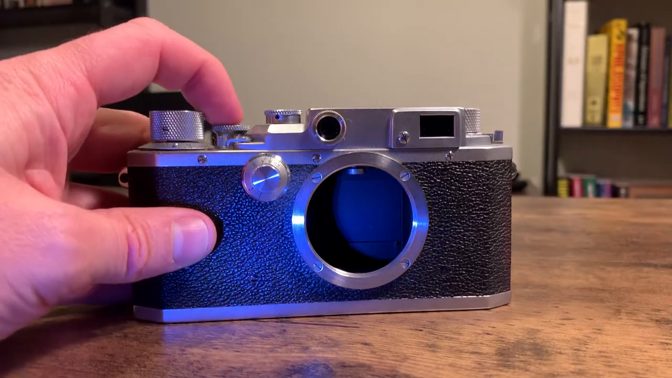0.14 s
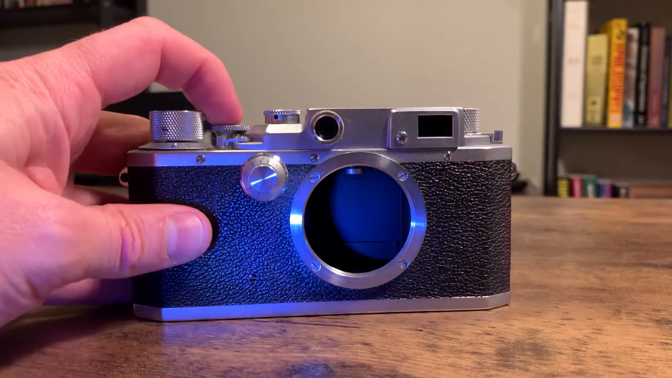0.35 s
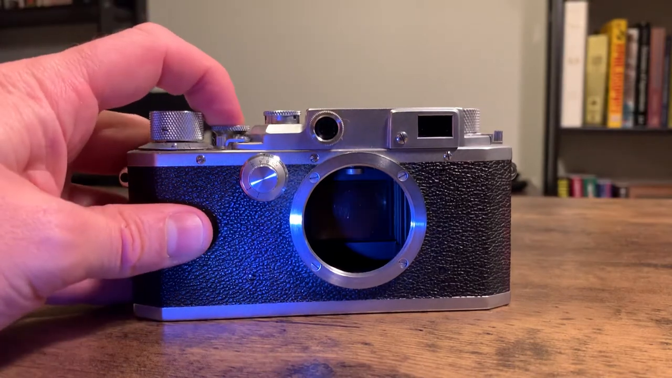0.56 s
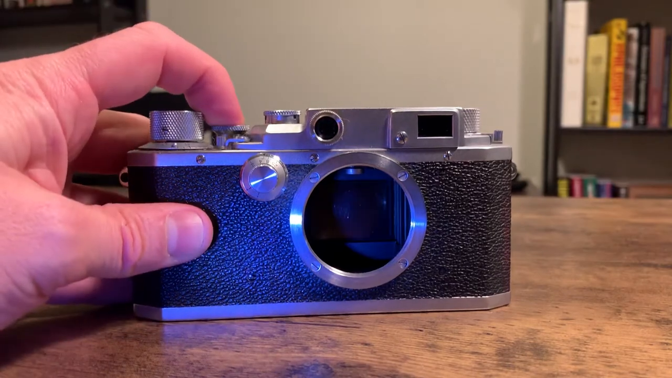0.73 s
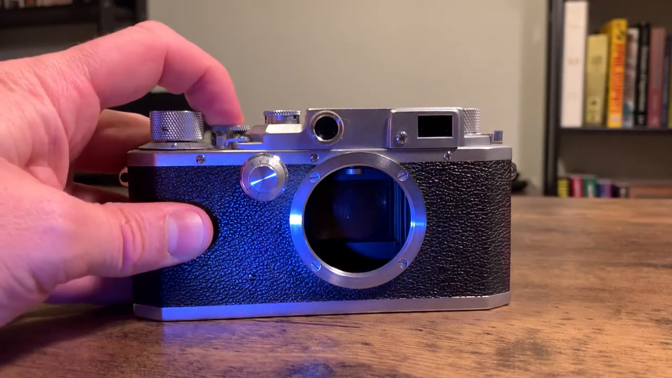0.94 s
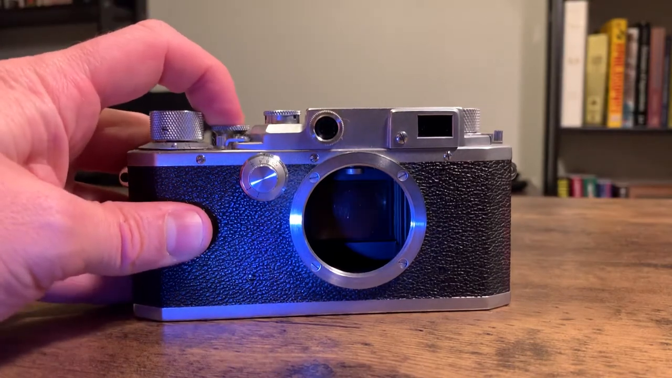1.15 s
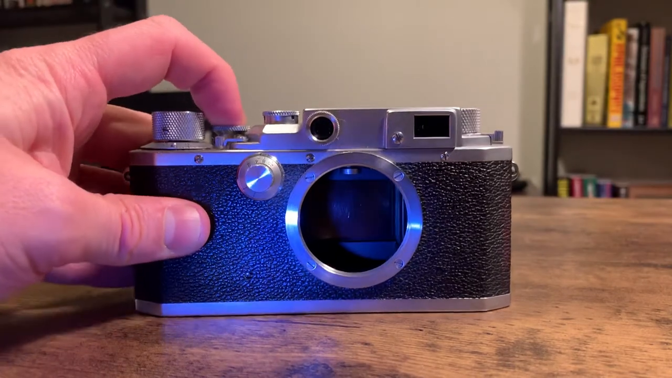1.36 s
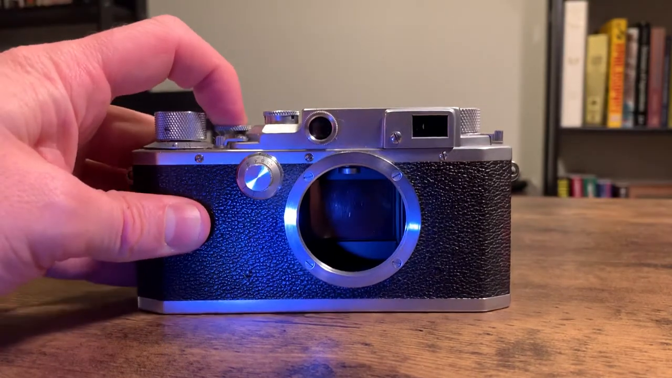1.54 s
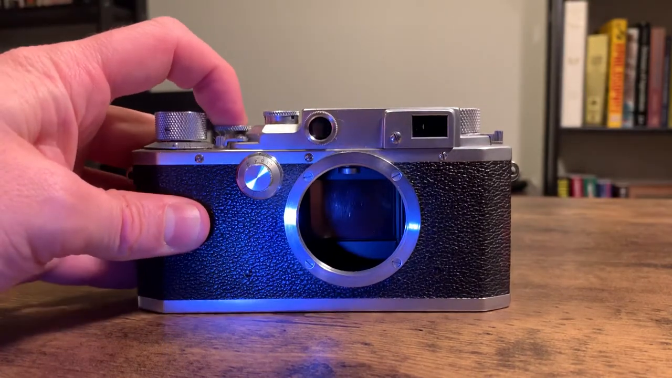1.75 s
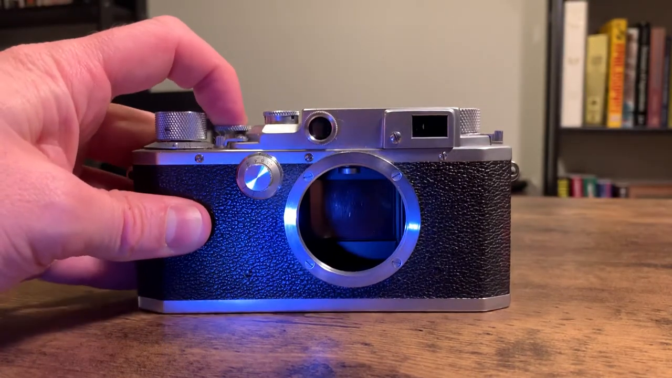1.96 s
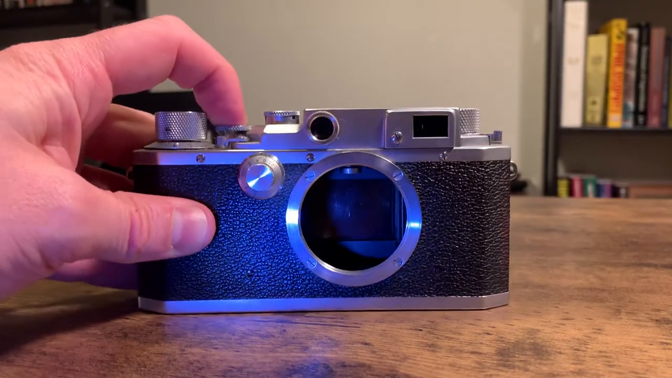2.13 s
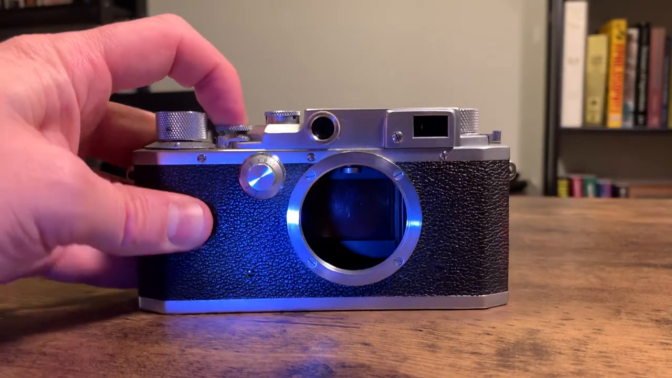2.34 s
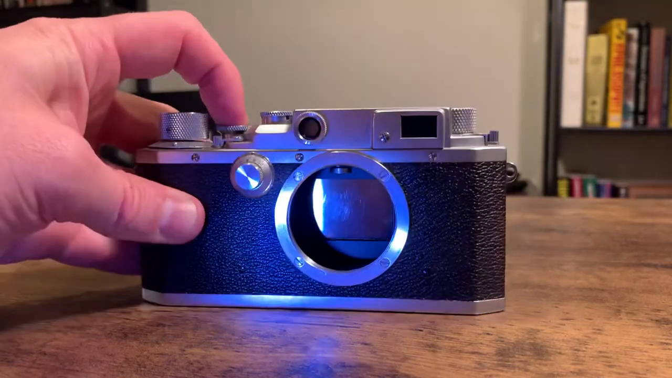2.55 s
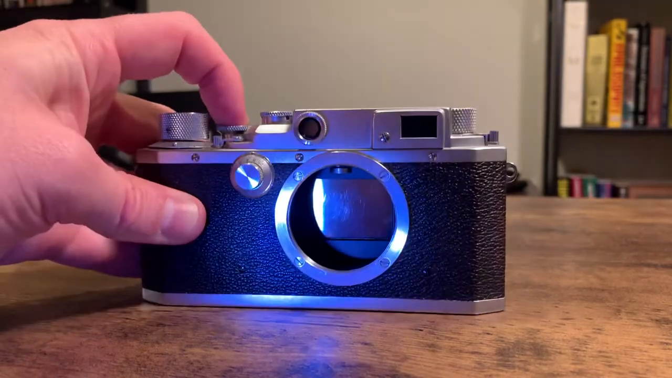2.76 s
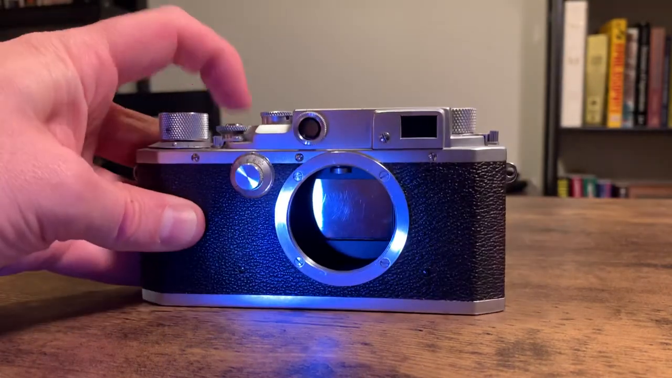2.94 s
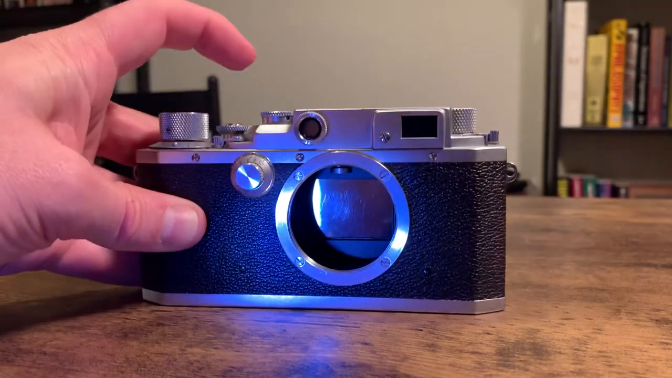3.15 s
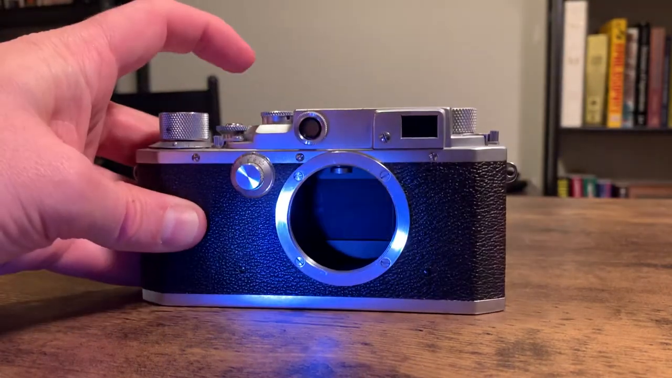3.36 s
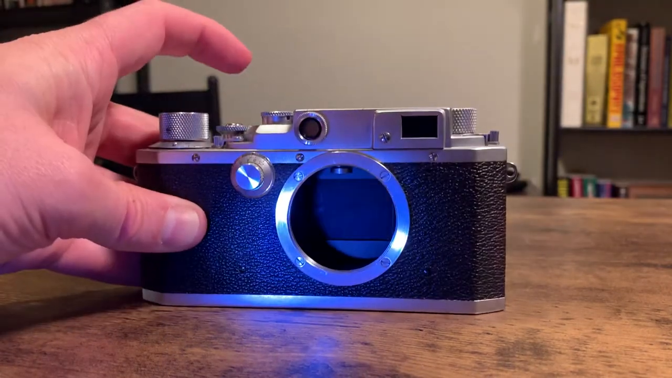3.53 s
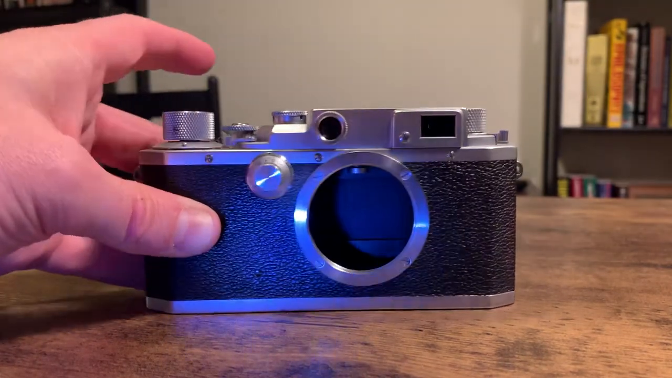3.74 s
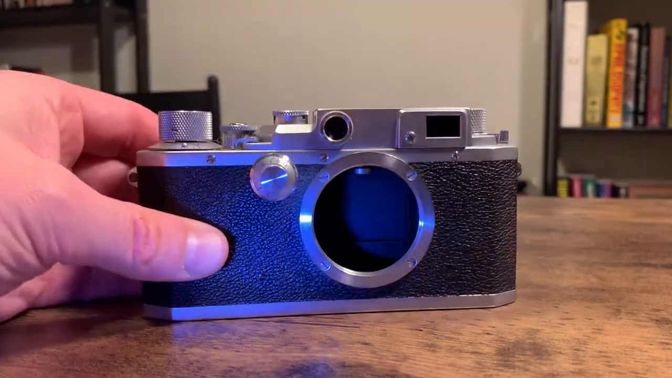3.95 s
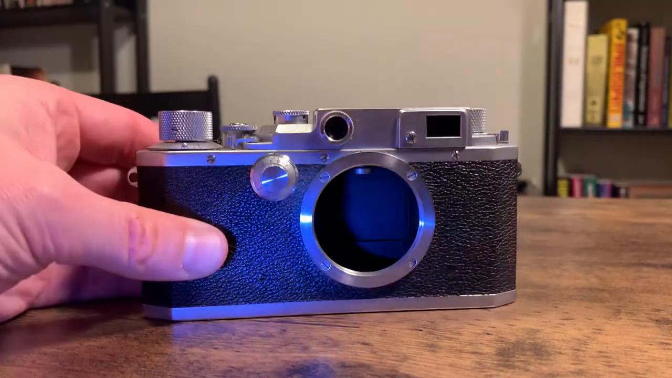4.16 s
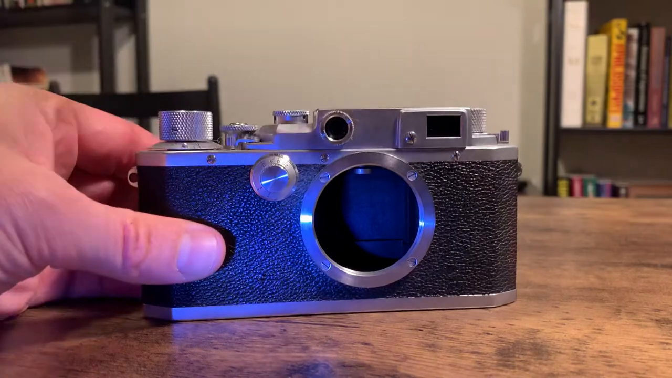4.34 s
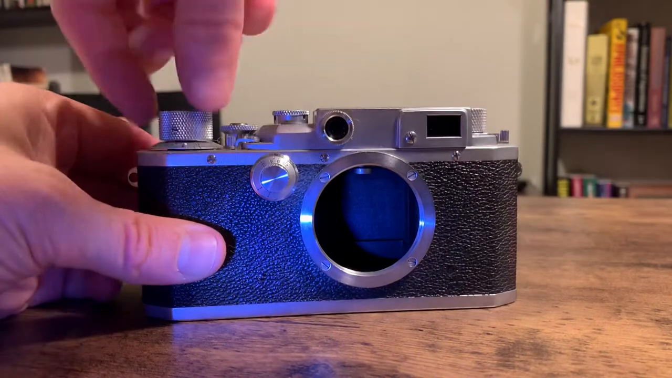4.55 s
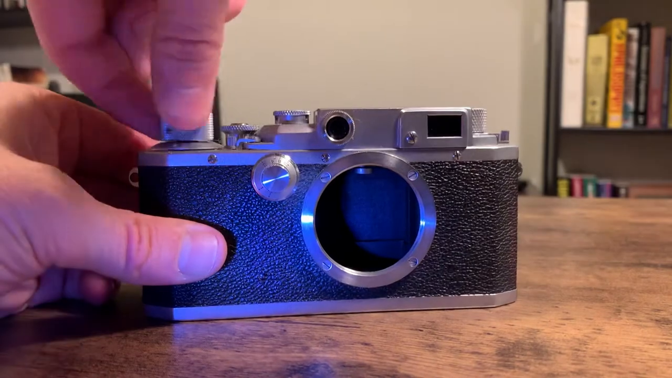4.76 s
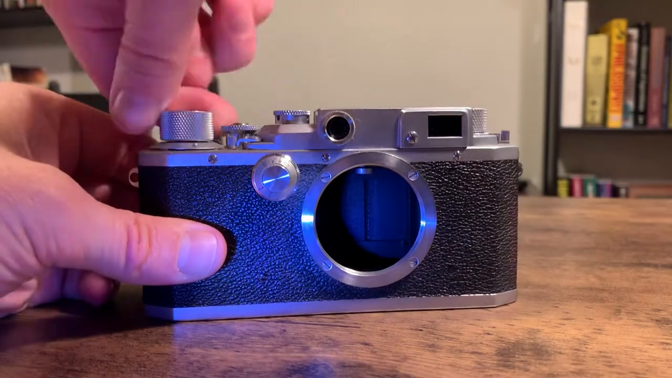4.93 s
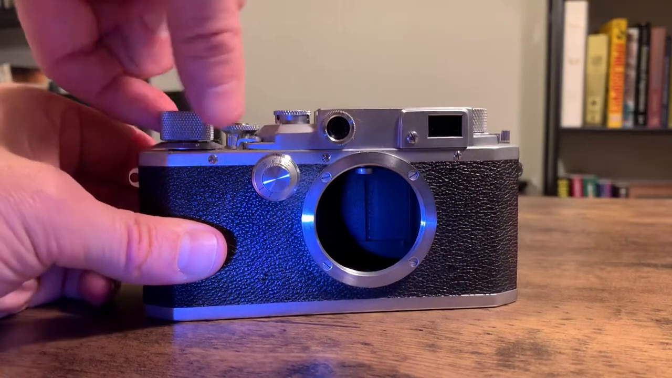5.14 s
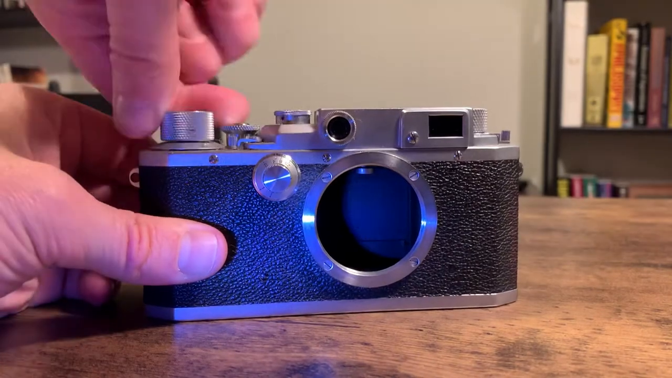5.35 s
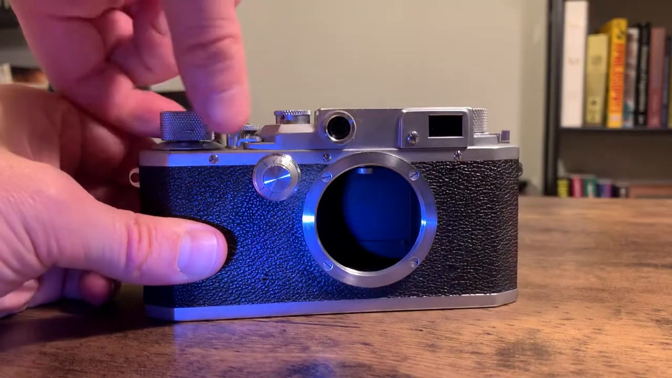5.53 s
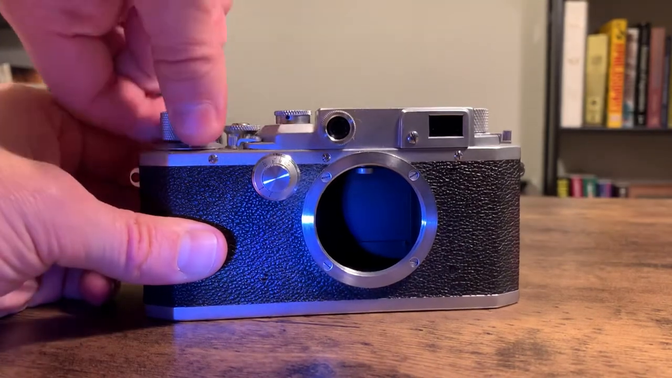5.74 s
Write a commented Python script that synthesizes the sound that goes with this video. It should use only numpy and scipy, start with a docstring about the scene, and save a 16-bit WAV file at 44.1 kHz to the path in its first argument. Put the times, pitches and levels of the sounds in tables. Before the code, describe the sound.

A quiet room with soft low air noise, faint hiss and a distant appliance hum, heard by a close stereo microphone. At about 0.4 s an old mechanical camera on a wooden table fires: a light click swells within a tenth of a second into a loud, bright steel clack with a dull body and table knock. Tiny bumps follow at 0.6 and 1.2 s, then faint finger clicks and a slight creak around 1.9-2.3 s. At 2.8 s a smaller click starts a fast, dry gear buzz that runs to about 3.17 s and ends at 3.2 s in a crisp, high metallic snap. Muffled bumps and scrapes come at 3.6-3.9 s. Around 4.2-4.4 s a nail ticks over knob ridges; small metal clicks cluster at 4.5-4.8 s, soft winding and creaking near 5-5.3 s, and a firmer click at 5.57 s before handling fades.

```python
"""An old cloth-shutter camera trips and slams on a wooden table, close to two microphone ports in a quiet room.
Later its slow-speed gears buzz until the second curtain runs and slams; fingers shift the body and wind the knob.
Blows and rubbing are bursts of noise sent through the resonances of steel, shell and table, with decaying pings.
A far appliance hums in wavering sine tones under the room air, which is shaped noise."""
import sys
import numpy as np
from scipy import signal
from scipy.fft import rfft, irfft, next_fast_len
from scipy.io import wavfile
from scipy.ndimage import uniform_filter1d, map_coordinates

SR = 44100
rng = np.random.default_rng(int(sys.argv[2]) if len(sys.argv) > 2 else 0)


def wrap_up_sound(samples):
    """Save the sound to the file named by the first command line argument, as 16-bit audio."""
    columns = np.atleast_2d(samples).T
    # keep every value between -1 and 1, then stretch to whole-number steps
    tamed = np.clip(columns, -1, 1)
    steps = np.round(tamed * 32767).astype(np.int16)
    wavfile.write(sys.argv[1], SR, steps)


N = 255515

# Resonances of the steel parts: (f/Hz, width/Hz, level/dB)
STEEL_MODES = [(2860, 250, -9), (3450, 250, -7), (4000, 300, -10), (4700, 350, -6), (5250, 400, -11),
               (5920, 190, -2), (6760, 190, -4), (7600, 350, -4), (9100, 400, -7), (10350, 280, 0),
               (11400, 300, -3), (12400, 400, -3), (13300, 500, -4), (14650, 250, 1), (15400, 250, -2)]
# Resonances of the camera body: (f/Hz, width/Hz, level/dB)
SHELL_MODES = [(1122, 180, -0.5), (1392, 42, 2), (1507, 260, -3.5), (1917, 350, -3.5), (2409, 340, -6.5)]
# Resonances of the wooden table: (f/Hz, width/Hz, level/dB)
TABLE_MODES = [(88.6, 29, 7), (178.6, 290, -4.5), (265, 55, 1.5), (315.1, 9.4, 2.5), (374.7, 87, 0),
               (431, 114.3, 4.5), (566, 130, -1), (636.4, 22, 3.5), (840, 78, -5)]
# Resonances of the ridged (knurled) winding knob: (f/Hz, width/Hz, level/dB)
KNOB_MODES = [(2945, 110, 10.5), (3550, 350, 6.5), (4400, 440, 3)]
# Bands of skin rubbing on leather: (f/Hz, width/Hz, level/dB)
SKIN_MODES = [(8530, 1360, 6), (9900, 1700, 2), (18000, 1900, 7)]
# Resonances of the winding gear train: (f/Hz, width/Hz, level/dB)
TRAIN_MODES = [(2950, 90, -2), (3640, 310, 0), (4400, 140, -14), (5630, 80, -9), (8300, 140, -10)]
# Resonances of the tightening spring: (f/Hz, width/Hz, level/dB)
SPRING_MODES = [(4900, 100, -5), (5960, 87, -1)]
# Resonances of a knob ridge springing back: (f/Hz, width/Hz, level/dB)
RIDGE_MODES = [(3160, 260, 0.5), (3710, 620, 3), (4490, 660, -1.5)]
# Resonances of the creaking shell: (f/Hz, width/Hz, level/dB)
CREAK_MODES = [(1142, 81, 3), (1900, 88, -7), (2360, 76, -9.5)]
# Bands in the appliance's air noise, before its treble is tilted down: (f/Hz, width/Hz, level/dB)
DUCT_MODES = [(535.3, 31, 6.5), (1496, 49.3, 2.5), (2290, 70, -2), (2820, 80, -0.5), (3440, 89, -3)]

# Shutter parts striking; the sign of focus is ignored: (t/s, steel level/dB, shell level/dB,
# table knock level/dB, brightest part f/Hz, focus/dB per octave squared, knock f/Hz, rattle t60/s,
# ping f/Hz, ping level/dB)
SHUTTER_BLOWS = [(0.4153, -36, -41.5, -43, 6800, 3, 474, 0.035, 5870, -41),
                 (0.4364, -29.5, -38.5, -27, 8130, -0.5, 323, 0.031, 3150, -40),
                 (0.4404, -15, -25, -26, 9100, -0.5, 332.7, 0.024, 4400, -21.5),
                 (0.4432, -32, -40, -30, 6017, 12, 440, 0.015, 5944, -31),
                 (0.4619, -45, -30.5, -26.5, 9990, 3, 313, .012, 5900, -58),
                 (0.4792, -16, -41.5, -38.5, 12070, 11, 318.8, 0.027, 5900, -35.5),
                 (0.4839, -6, -15.5, -19.5, 9900, 1, 330, 0.015, 6010, -17),
                 (0.4882, -26, -19, -19, 11000, 3, 450, 0.012, 1120, -26),
                 (0.4979, -28, -26, -24, 6000, 8.5, 605, 0.01, 3212, -34.5),
                 (2.810, -41, -41.5, -46, 9100, -1, 396, 0.07, 6000, -51),
                 (2.822, -21, -36, -30, 10450, 3.5, 253, 0.019, 5400, -42),
                 (2.8391, -31, -50, -30, 6100, 1, 257, 0.031, 5900, -49),
                 (3.1617, -29, -35, -54, 6950, 13, 454, 0.018, 6180, -36),
                 (3.1853, -39, -59, -29.5, 10300, 7, 694, 0.012, 5970, -40),
                 (3.199, -21, -61, -34, 5600, -7, 600, 0.011, 5860, -32.5),
                 (3.2024, -11.5, -30, -50, 14900, 23, 600, 0.0095, 14700, -7),
                 (3.2046, -34, -57.5, -53, 12300, 17, 600, 0.0099, 12500, -21),
                 (3.2043, -18.5, -27.5, -20.5, 4960, 29, 626, 0.0075, 633, -16.5)]
# Finger and knob clicks on the metal: (t/s, steel level/dB, shell level/dB, table knock level/dB,
# brightest part f/Hz, rattle t60/s, ping f/Hz, ping level/dB)
FINGER_CLICKS = [(1.927, -63, -45.5, -57, 5030, 0.031, 3300, -62),
                 (2.092, -47, -44.5, -64, 11050, 0.028, 5500, -59),
                 (2.1107, -44.5, -48, -43, 8500, 0.03, 6560, -54),
                 (2.252, -65, -53, -53, 8930, .025, 4300, -73),
                 (4.138, -58, -50, -44, 10200, 0.03, 6920, -73),
                 (4.4868, -41, -45, -46, 6800, 0.016, 3590, -47.5),
                 (4.491, -44.5, -41.5, -39.5, 6440, 0.024, 2120, -50),
                 (4.6455, -42, -53, -48, 9100, 0.018, 6460, -49.5),
                 (4.6612, -44, -46, -39, 5500, 0.023, 6940, -55),
                 (4.687, -41.5, -50, -65, 11100, 0.019, 13030, -39),
                 (4.753, -45, -43, -45, 4500, .06, 3000, -56),
                 (4.7617, -31, -36.5, -47, 5880, 0.049, 3420, -38),
                 (4.7684, -32.5, -45, -31, 7640, 0.014, 6300, -41),
                 (4.9034, -64, -37, -38, 4980, 0.021, 1130, -37),
                 (4.903, -74.5, -58, -58, 5000, .016, 1775, -34.5),
                 (5.256, -62, -57, -32, 4600, .025, 4930, -55),
                 (5.259, -63, -55, -40, 4580, .025, 4200, -54.5),
                 (5.365, -65, -51, -37.5, 6750, 0.032, 6770, -71.5),
                 (5.553, -61.5, -52, -55, 9000, .02, 3490, -69),
                 (5.56, -45, -49.5, -55, 9970, 0.033, 11100, -60),
                 (5.566, -29.5, -37, -39, 12170, 0.014, 15400, -30),
                 (5.569, -31.5, -33.5, -31, 5960, 0.033, 4930, -34)]
# Dull bumps of the body on the table: (t/s, shell level/dB, table knock level/dB, knock f/Hz)
BODY_BUMPS = [(0.553, -46, -42, 314.2), (0.594, -47.5, -39.5, 311.4), (1.2055, -59, -46, 520),
              (1.251, -59, -44, 429), (2.296, -46, -43.5, 606), (2.314, -58.5, -40.5, 89.7),
              (2.344, -56, -40, 451), (3.577, -58.5, -32, 459), (3.606, -41.5, -39.5, 180),
              (3.626, -49, -40, 502), (3.676, -60, -31.5, 432), (3.706, -62, -36, 345),
              (3.843, -53.5, -33, 500), (3.862, -53, -31.5, 327.4), (4.149, -62, -40, 89),
              (5.575, -41.5, -33, 298), (5.584, -44, -40, 400)]
# Body tones after a shutter blow: (f/Hz, level over the shell/dB, t60/s)
BODY_TONES = [(247, -21.5, .12), (310, -12, 0.21), (420.2, -16.5, 0.087), (726.4, -16.5, 0.045),
              (827, -5, .016), (1108, -19.5, 0.078), (1347, -8, 0.035), (2860, -11.5, 0.024),
              (3270, -12.5, 0.016)]
# Curtain runs: (release t/s, fastest t/s, hold/s, rise/dB per second, steel level/dB, shell level/dB)
CURTAIN_RUNS = [(0.43, 0.489, 0.0038, 502.5, -28, -31.5), (2.823, 2.826, 0.0034, 399, -31.5, -40.5),
                (3.172, 3.186, 0.019, 802, -25, -36)]
# Fall after a curtain run: steel, shell (fall/dB per second)
CURTAIN_FALL = [1500.5, 600]
# Slow-speed gears: (t/s, level/dB)
GEAR_LEVELS = [(2.832, -40), (2.846, -42), (2.93, -43.5), (3.04, -43.5), (3.134, -42), (3.164, -35),
               (3.17, -60)]
# Teeth of the star wheel passed so far: (t/s, count)
GEAR_TEETH = [(2.83, 0), (2.848, 3), (2.917, 14), (2.9605, 20), (3.032, 31), (3.063, 36), (3.106, 44),
              (3.154, 53), (3.17, 56)]
# Hand movements: (strongest t/s, hold/s, table level/dB, shell level/dB, knob level/dB, skin level/dB)
HAND_MOVES = [(1.25, 0.0076, -44.5, -68, -96, -88), (1.95, 0.0093, -73, -80, -81, -99),
              (2.09, 0.02, -61, -71, -70.5, -74), (2.34, 0.0058, -40, -56, -70.5, -92),
              (3.61, 0.027, -40, -54, -70, -84), (3.85, 0.012, -48, -67, -93, -83),
              (4.15, 0.023, -61.5, -67, -69.5, -81), (4.3, 0.019, -64.5, -62, -56.5, -91),
              (4.36, 0.023, -85, -88, -66.5, -93), (4.505, 0.019, -62.5, -62, -62, -67),
              (4.65, 0.015, -54.5, -67.5, -65.5, -81), (4.78, 0.033, -44.5, -50, -57.5, -67),
              (4.97, 0.078, -56.5, -67.5, -73, -70), (5.2, 0.079, -46.5, -55, -69, -81),
              (5.4, .02, -84, -99, -100, -77), (5.56, 0.0042, -63, -82, -90, -82),
              (5.6, 0.0058, -54.5, -66.5, -65, -84), (5.7, .01, -62, -73, -97, -99)]
# Rise of a hand movement: table, shell, knob, skin (rise/dB per second)
HAND_RISE = [239, 228, 308, 250]
# Fall of a hand movement: table, shell, knob, skin (fall/dB per second)
HAND_FALL = [187, 227, 273, 222]
# The resting hand: one row each for table and shell (level/dB)
HAND_REST = [
    [-70.5],
    [-76],
]
# Winding, inside one outer list: (t/s, gear train level/dB, tightening spring level/dB)
WINDING_LEVELS = [
    [(4.9, -69, -97.5), (4.96, -69.5, -86.5), (5.05, -65.5, -96), (5.14, -68, -80), (5.17, -68, -76),
     (5.2, -85, -66.5), (5.225, -88, -67), (5.27, -88, -73), (5.3, -93, -93)],
]
# The shell creaking in the grip: (t/s, hold/s, level/dB)
SHELL_CREAKS = [(2.076, 0.017, -54.5), (2.272, 0.0084, -56), (2.3, .03, -56), (4.81, 0.026, -59.5),
                (5.185, 0.043, -54.5), (5.288, .02, -61.5)]
# A nail catching the knob ridges: (t/s, peak level/dB)
NAIL_TICKS = [(4.2438, -40.5), (4.273, -38), (4.2803, -43), (4.2847, -46), (4.2935, -43), (4.2973, -42),
              (4.304, -46), (4.322, -47), (4.326, -41.5), (4.367, -54), (4.386, -41.5)]

# Lines of the appliance's motor: (f/Hz, waver/Hz, largest flutter/dB, rms level/dB, left-right/dB)
MOTOR_LINES = [(57.8, 1.16, 1.5, -52, -3), (169.3, 4.414, 5, -64, 0), (259, 5, 4.5, -58.5, 0)]
# Colour of the room air: (f/Hz, relative level/dB per Hz)
AIR_COLOUR = [(15, -42), (35, -17), (70, -10), (110, -18), (170, -12), (215, -20), (260, -7.5),
              (295, -16.5), (335, -12), (420, -22.5), (600, -27), (1000, -30.5), (2000, -45.5),
              (5000, -67.5), (9000, -120)]
# Colour of the microphone hiss: (f/Hz, relative level/dB per Hz)
HISS_COLOUR = [(2000, -23), (4000, -3), (8000, -5.5), (12000, -8), (14000, -13), (14600, -13),
               (15000, -3.5), (15400, -12.5), (15800, -22.5), (16500, -25.5)]
# Phase by which the left port leads: (f/Hz, lead/rad)
PORT_LEAD = [(0, 0), (600, .8), (1100, 1.3), (1500, 1.9), (2100, 3), (3000, 3.6), (4200, 6.3),
             (6300, 2 * np.pi), (8600, np.pi), (11000, 0), (13600, -np.pi), (16200, -2 * np.pi)]
# How alike left and right are for close sounds: (f/Hz, likeness)
NEAR_LIKENESS = [(100, 1), (700, 0.12), (1500, 0.59), (3000, 0.36), (6000, 0.7), (7500, 0.86),
                 (16000, 0.91)]
# How alike left and right are for far sounds: (f/Hz, likeness)
FAR_LIKENESS = [(60, 0.9), (300, 0.61), (800, 0.059), (1800, 0.61), (4000, 0.1), (7000, 0.18), (8500, 1),
                (16000, 0.58)]
# Left-right balance of the close sounds: (f/Hz, left-right/dB)
NEAR_BALANCE = [(60, -8.5), (130, 1.5), (290, -5.5), (640, 1), (1410, 0.5), (3100, -1.5), (6820, -1),
                (15000, 0)]
# Dying time of the room's echo: (f/Hz, t60/s)
ROOM_T60 = [(200, 0.27), (1000, 0.13), (2500, 0.44), (5000, 0.43), (10000, 0.21), (16000, 0.13)]

CLICK_FOCUS_DB, CLICK_KNOCK_HZ = 2.5, 424  # focus in dB per octave squared
BUMP_T60, NAIL_T60 = 0.022, 0.0012  # s
SHELL_DULL_HZ = 3200  # the leather-clad shell gives little treble
GRIP_DULL_HZ = 4500  # the hand damps the treble of the scraping, creaking body
PING_T60, PING_SHORTENS = 0.018, 0.25  # s at 1 kHz; higher pings die sooner by this power of pitch
PING_RISE_S, BODY_RISE_S = .0006, 0.001
PING_LAG_S, BODY_LAG_S = .0007, .002  # tones ring out just after the contact
CREAK_RISE_DB, CREAK_FALL_DB = 900, 700  # per second
SNAP_DB, SNAP_LEAN_DB = -5, 8  # snap over its rattle; loss per octave that the part is duller than 10 kHz
TOP_HZ = 16700


def amp(db):
    """Turns decibels into a multiplier."""
    return 10 ** (np.asarray(db) / 20)


def unit(x):
    """Scales a sound to an rms of one."""
    return x / np.sqrt(np.mean(x ** 2) + 1e-20)


def along(points, hz):
    """Reads a (f/Hz, value) curve on a log frequency axis."""
    f, v = np.transpose(points)
    return np.interp(np.log(hz + 1), np.log(f + 1), v)


def gains(rows):
    """Reads each dB column as a gain for every sample, practically silent outside the table."""
    t = np.arange(N) / SR
    times, *columns = np.transpose(rows)
    return np.array([amp(np.interp(t, times, column, -200, -200)) for column in columns])


def wobble(rate):
    """Draws a smooth random curve through `rate` random points a second."""
    points = rng.standard_normal(int(N * rate / SR) + 4)
    return map_coordinates(points, [np.arange(N) * rate / SR])


def filtered(x, response):
    """Shapes a sound by a response that depends on frequency."""
    m = next_fast_len(x.shape[-1] + 8192)  # spare room for the ringing
    spectrum = rfft(x, m) * response(np.fft.rfftfreq(m, 1 / SR))
    return irfft(spectrum, m)[..., :x.shape[-1]]


def modes(table, centre_hz=1., lean_db=0.):
    """Adds up resonances; those away from the centre lose lean_db per octave squared."""
    def response(f):
        total = 0
        for k, (c, width, db) in enumerate(table):
            level = amp(db - lean_db * np.log2(c / centre_hz) ** 2)
            total = total + (-1) ** k * level * 1j * f * width / (c * c - f * f + 1j * f * width)
        return total
    return response


def grit(table, rough_db, rate, centre_hz=1., lean_db=0.):
    """Makes friction: noise in lumps of random size, heard through resonances."""
    lumps = amp(rough_db * wobble(rate)) * rng.standard_normal((2, N))
    return unit(filtered(lumps, modes(table, centre_hz, lean_db)))


def ports(pair, alike):
    """Mixes two independent draws into left and right, with the phase turn of the microphone ports."""
    def blend(hz):
        turn = np.arccos(np.clip(along(alike, hz), -1, 1)) / 2
        return np.array([np.cos(turn), np.sin(turn)])

    def phase(hz):
        half_lead = np.interp(hz, *np.transpose(PORT_LEAD)) / 2
        return np.exp(1j * np.outer([1, -1], half_lead))

    mid, side = filtered(pair, blend)
    return filtered(np.array([mid + side, mid - side]), phase)


def swells(rows, rise_db, fall_db):
    """Makes gains that rise to each row's level, hold and fall, at set dB a second."""
    t, out = np.arange(N) / SR, np.zeros((len(rise_db), N))
    for s, hold, *level_db in rows:
        near = slice(round((s - .3) * SR), round((s + hold + .3) * SR))
        before = np.maximum(s - t[near], 0)
        after = np.maximum(t[near] - s - hold, 0)
        drop_db = np.outer(rise_db, before) + np.outer(fall_db, after)
        out[:, near] += amp(np.reshape(level_db, (-1, 1)) - drop_db)
    return out


def add_at(out, s, sound):
    """Adds a short sound to a longer one, starting at s seconds."""
    out[:, round(s * SR):][:, :sound.shape[-1]] += sound


def coloured_noise(response):
    """Shapes steady random noise by frequency and evens out its level."""
    return unit(filtered(rng.standard_normal((2, N)), response))


def room_air():
    """Room air is deep, shaped noise that slowly drifts in level."""
    return amp(-55.0 + 0.92 * wobble(2.2)) * coloured_noise(lambda hz: amp(along(AIR_COLOUR, hz)))


def appliance_air():
    """The appliance's air noise has resonant bands and loses 6 dB per kHz."""
    air = coloured_noise(lambda hz: modes(DUCT_MODES)(hz) * amp(-6 * hz / 1000))
    return amp(-65.5 + 2.0 * wobble(4.5)) * air


def hiss():
    """Microphone hiss is faint, steady, shaped noise."""
    return amp(-86.0) * coloured_noise(lambda hz: amp(along(HISS_COLOUR, hz)))


def hum():
    """The appliance's motor gives sine tones that waver in pitch and flutter in level."""
    t, out = np.arange(N) / SR, np.zeros((2, N))
    for hz, waver, flutter_db, db, pan_db in MOTOR_LINES:
        flutter = flutter_db * np.tanh(wobble(7.6))
        level = np.sqrt(2) * amp(db + flutter + pan_db / 2 * np.array([[1], [-1]]))
        cycles = hz * t + np.cumsum(waver * wobble(9)) / SR
        out += level * np.sin(2 * np.pi * cycles + [[.5], [0]])
    return out


def creaks():
    """The shell creaks in the grip: brief lumpy friction through its resonances."""
    level = swells(SHELL_CREAKS, [CREAK_RISE_DB], [CREAK_FALL_DB])
    return level * grit(CREAK_MODES, rough_db=3.5, rate=170)


def winding():
    """The turning knob winds the gear train and tightens the spring, each a rough rubbing sound."""
    train, spring = gains(WINDING_LEVELS[0])
    return (train * grit(TRAIN_MODES, rough_db=3.0, rate=220)
            + spring * grit(SPRING_MODES, rough_db=3.0, rate=190))


def handling():
    """The body scrapes on the table and creaks; skin rubs the leather and the knurled knob."""
    table, shell, knob, skin = swells(HAND_MOVES, HAND_RISE, HAND_FALL)
    table, shell = amp(HAND_REST) + [table, shell]
    scrape = table * grit(TABLE_MODES, rough_db=3.5, rate=60, centre_hz=420, lean_db=4.5)
    shift = shell * grit(SHELL_MODES, rough_db=3.5, rate=60)
    body = filtered(scrape + shift + creaks(), lambda hz: 1 / (1 + 1j * hz / GRIP_DULL_HZ))
    knob_rub = knob * grit(KNOB_MODES, rough_db=4.5, rate=450)
    skin_rub = skin * grit(SKIN_MODES, rough_db=2.0, rate=160)
    return body + knob_rub + skin_rub + winding()


def strikes(rows):
    """Each contact is a short snap and rattle in the steel and shell, and one push on the table top."""
    out, t = np.zeros((2, N + SR)), np.arange(SR // 5) / SR

    def dull_shell(hz):
        return modes(SHELL_MODES)(hz) / (1 + 1j * hz / SHELL_DULL_HZ) ** 2

    for s, db, shell_db, knock_db, bright_hz, focus_db, knock_hz, t60 in rows:
        noise = rng.standard_normal((4, 2, len(t)))
        rattle = (1 - np.exp(-t / 0.00049)) ** 2 * amp(-60 * t / max(t60, .003))
        push = t * np.exp(-t / .0003) * (1 + .7 * noise[2])
        snap_db = db + SNAP_DB + SNAP_LEAN_DB * min(0, np.log2(bright_hz / 1e4))
        focus_db = abs(focus_db)
        parts = [(db, rattle * noise[0], modes(STEEL_MODES, bright_hz, focus_db)),
                 (shell_db, rattle * noise[1], dull_shell),
                 (knock_db, push, modes(TABLE_MODES, knock_hz, lean_db=10)),
                 # cubing makes the snap shorter; only the brighter steel parts snap
                 (snap_db, rattle ** 3 * noise[3], modes(STEEL_MODES[8:], bright_hz, focus_db))]
        for level_db, force, ring in parts:
            sound = filtered(force, ring)
            add_at(out, s, amp(level_db) * sound / np.abs(sound).max())
    return out[:, :N]


def contacts():
    """Shutter blows, clicks under the fingers and dull bumps, which leave the steel silent."""
    blows = [row[:8] for row in SHUTTER_BLOWS]
    clicks = [(*row[:5], CLICK_FOCUS_DB, CLICK_KNOCK_HZ, row[5]) for row in FINGER_CLICKS]
    bumps = [(s, -np.inf, shell_db, knock_db, 1., 0., hz, BUMP_T60)
             for s, shell_db, knock_db, hz in BODY_BUMPS]
    return strikes(blows + clicks + bumps)


def pings():
    """Struck parts, then the body, ring as sine tones that swell for about a millisecond and die away."""
    out, t = np.zeros((2, N + SR)), np.arange(SR // 8) / SR
    tones = []
    for s, *_, hz, db in SHUTTER_BLOWS + FINGER_CLICKS:
        t60 = PING_T60 * (1000 / hz) ** PING_SHORTENS
        tones.append((s + PING_LAG_S, hz, db, t60, PING_RISE_S))
    for s, _, shell_db, *_ in SHUTTER_BLOWS:
        for hz, db, t60 in BODY_TONES:
            tones.append((s + BODY_LAG_S, hz, shell_db + db, t60, BODY_RISE_S))
    for s, hz, db, t60, rise in tones:
        tone = np.sin(2 * np.pi * (hz * t + [[0], [.08]]))
        fade = amp(db - 60 * t / t60) * (1 - np.exp(-t / rise))
        add_at(out, s, fade * 2 * tone)
    return out[:, :N]


def walls(x):
    """The room stores sound energy band by band and lets it die at its own speed as diffuse noise."""
    late = np.pad(x, ((0, 0), (260, 0)))[:, :N]  # 260 samples late
    hz, t, z = signal.stft(late, SR, nperseg=256)
    power = uniform_filter1d(np.mean(np.abs(z) ** 2, 0), size=5, axis=0)  # many paths even out the colour
    keep = amp(-120 * t[1] / np.clip(along(ROOM_T60, hz), .05, 1))  # energy kept per step
    stored = np.array([signal.lfilter([1 - k], [1, -k], band) for k, band in zip(keep, np.abs(power))])
    noise = signal.stft(rng.standard_normal((2, N)), SR, nperseg=256)[2]
    diffuse = unit(np.abs(noise)) * np.exp(1j * np.angle(noise))
    return signal.istft(diffuse * np.sqrt(stored), SR, nperseg=256)[1][:, :N]


def curtains():
    """The running curtains drag their ribbons and rollers, louder as they gather speed."""
    t, levels = np.arange(N) / SR, np.zeros((2, N))
    for start, s, hold, rise_db, *db in CURTAIN_RUNS:
        levels += (t > start) * swells([(s, hold, *db)], [rise_db] * 2, CURTAIN_FALL)
    steel, shell = levels
    return (steel * grit(STEEL_MODES, rough_db=1.2, rate=700)
            + shell * grit(SHELL_MODES, rough_db=1.5, rate=200))


def gears():
    """The pallet ticks on the star wheel; each tick is a puff of tiny contacts, now duller, now brighter."""
    teeth = np.interp(np.arange(N) / SR, *np.transpose(GEAR_TEETH))
    at = np.flatnonzero(np.diff(np.floor(teeth + .05 * wobble(120))) > 0)  # slightly uneven timing
    ticks = np.zeros(N)
    ticks[at] = amp(2.8 * rng.standard_normal(N)[at])
    t = np.arange(SR // 50) / SR
    puff = (1 - np.exp(-t / .0005)) * amp(-60 * t / .009)
    puffs = signal.fftconvolve(ticks, puff)[:N] + .05
    # (level/dB, steady whirr under the ticks, resonances)
    parts = [(-5.0, 0.45, modes(STEEL_MODES, 5370, lean_db=8.0)),
             (1.5, 0.041, modes(STEEL_MODES, 11604, lean_db=12.0)),
             (4.5, 0.031, modes(STEEL_MODES, 13000, lean_db=2.5)),
             (-10.5, 0.45, modes(SHELL_MODES))]
    sound = np.zeros((2, N))
    for part_db, whirr, ring in parts:
        strength = amp(part_db + 1.5 * wobble(60)) * (puffs + abs(whirr))
        sound += filtered(strength * rng.standard_normal((2, N)), ring)
    level = gains(GEAR_LEVELS)[0]
    return level * sound / np.std(sound[:, level > 1e-9])  # evened out over the buzz alone


def nail():
    """A nail catches the knurl: dry noise ticks as single ridges let go."""
    out, t = np.zeros((2, N + SR)), np.arange(SR // 20) / SR
    for s, db in NAIL_TICKS:
        burst = amp(-60 * t / NAIL_T60) * rng.standard_normal((2, len(t)))
        tick = filtered(burst, modes(RIDGE_MODES))
        add_at(out, s, amp(db) * tick / np.abs(tick).max(axis=1, keepdims=True))
    return out[:, :N]


def scene():
    """Adds the close camera and hands, the room's answer to the camera, and the far background."""
    camera = contacts() + curtains() + gears()
    close = ports(camera + pings() + nail() + handling(), NEAR_LIKENESS)
    near = filtered(close, lambda hz: amp(np.outer([1, -1], along(NEAR_BALANCE, hz) / 2)))
    background = room_air() + appliance_air() + hiss()
    far = ports(amp(-14.0) * walls(camera) + background, FAR_LIKENESS)
    return near + far + hum()


def record(dry):
    """Treble falls away above 15.7 kHz and stops at the band limit."""
    return filtered(dry, lambda hz: (hz < TOP_HZ) * amp(-40 * np.clip((hz - 15700) / 1000, 0, 1)))


dry = scene()
out = record(dry)
wrap_up_sound(out)
```